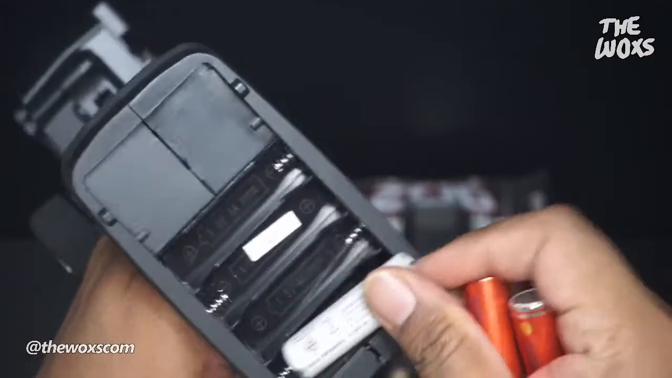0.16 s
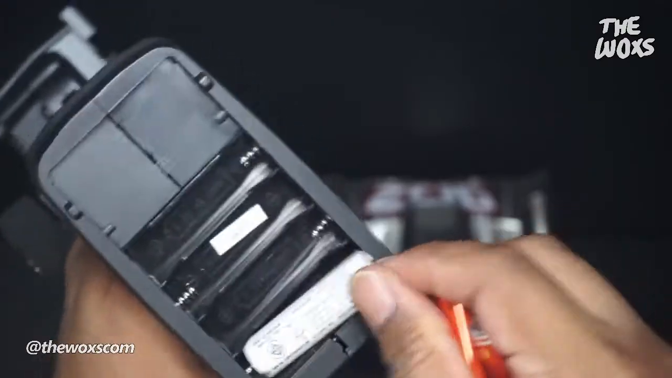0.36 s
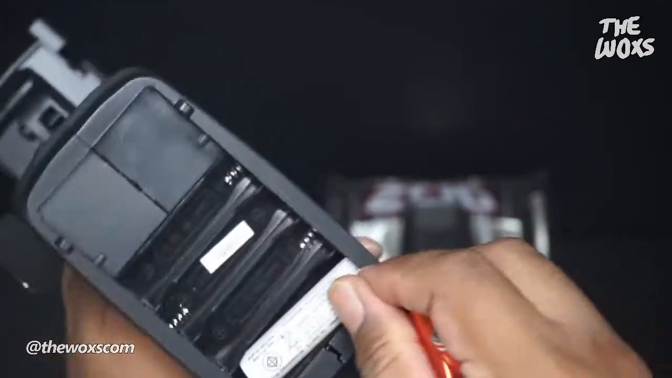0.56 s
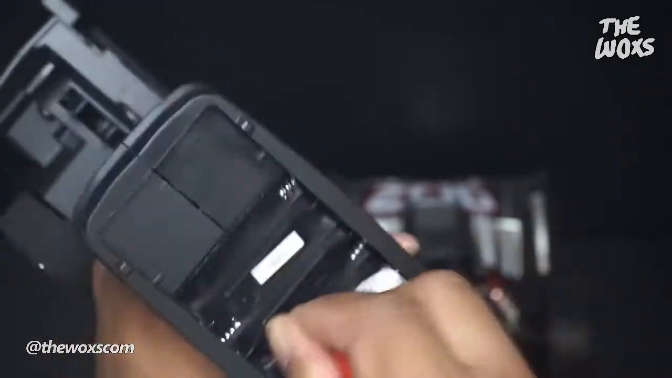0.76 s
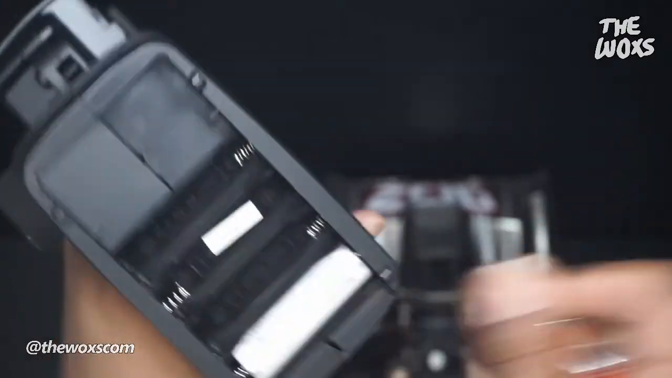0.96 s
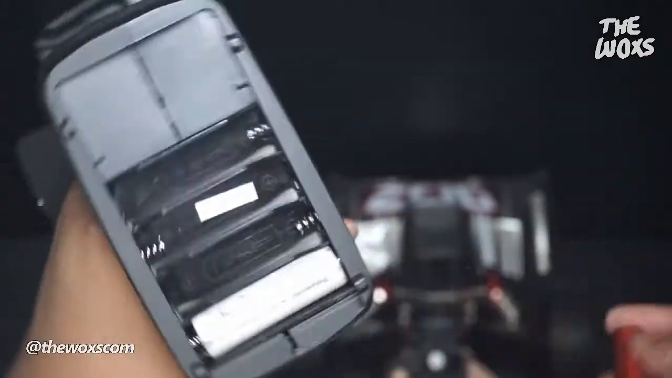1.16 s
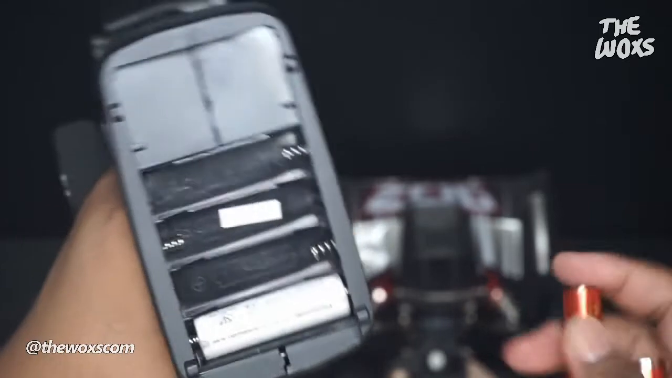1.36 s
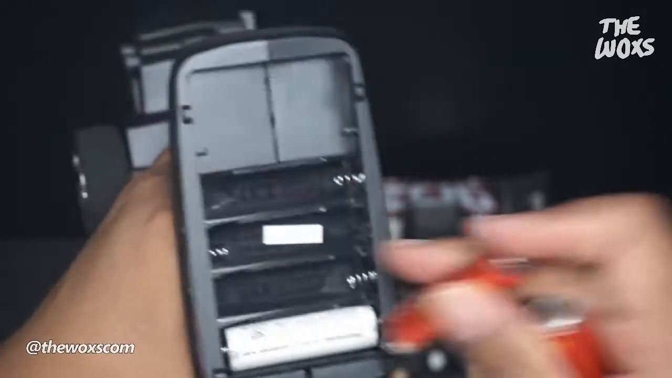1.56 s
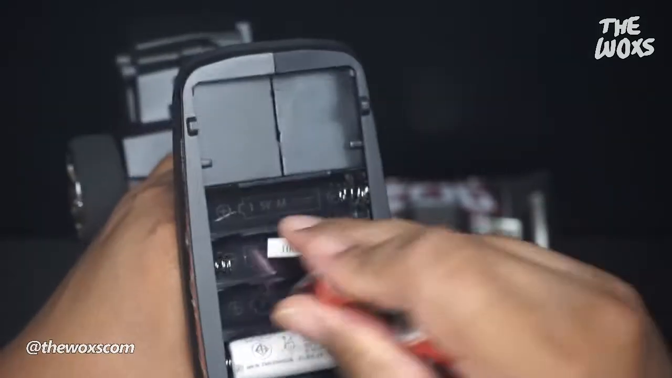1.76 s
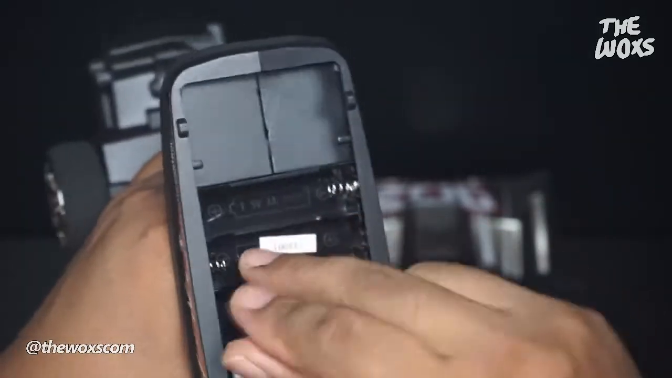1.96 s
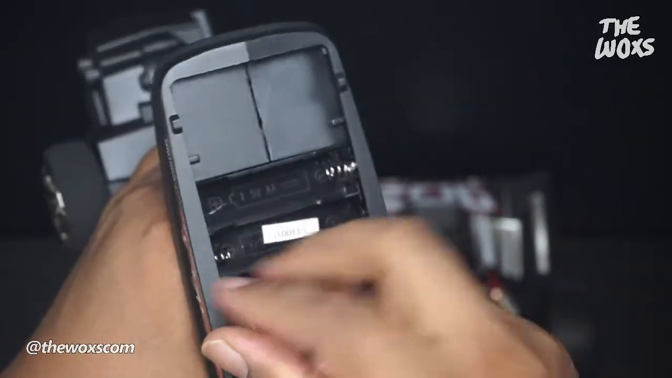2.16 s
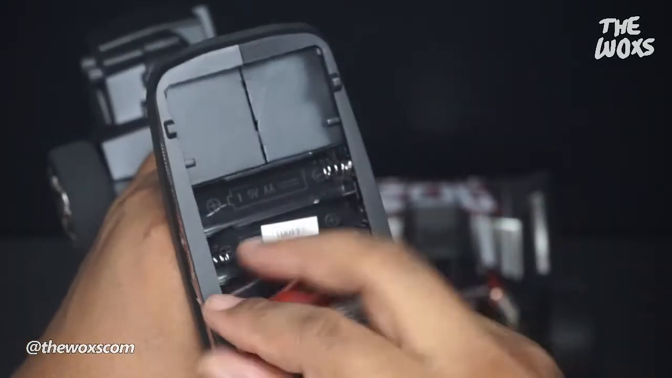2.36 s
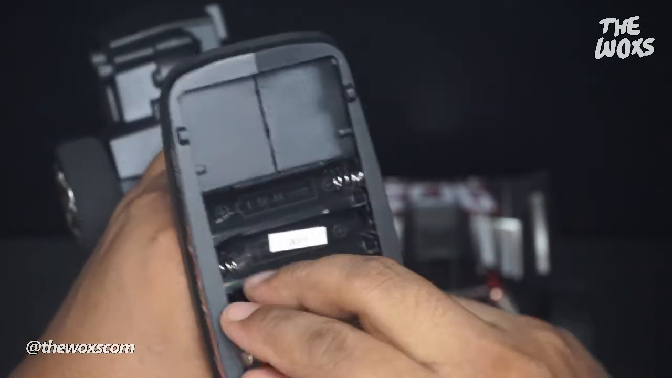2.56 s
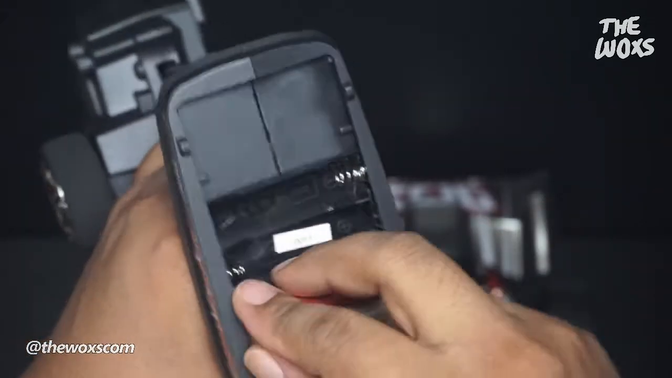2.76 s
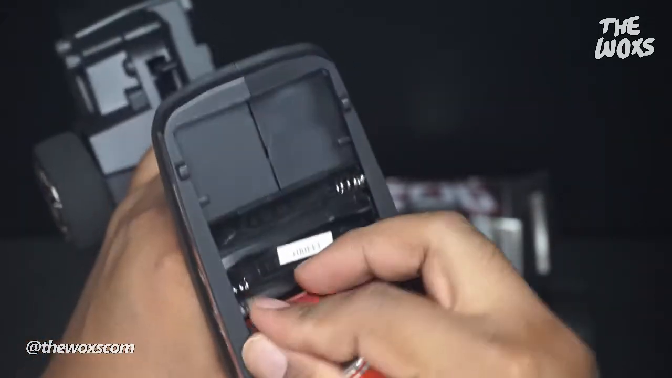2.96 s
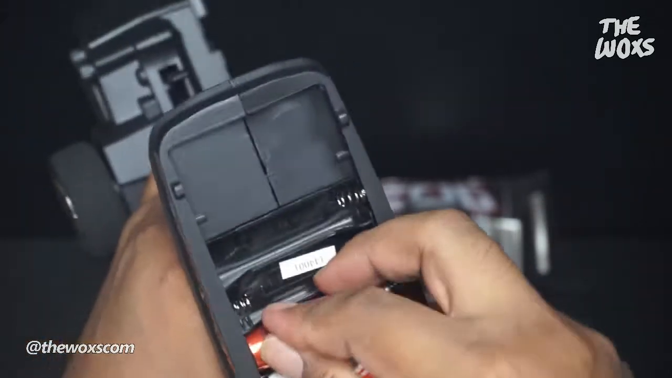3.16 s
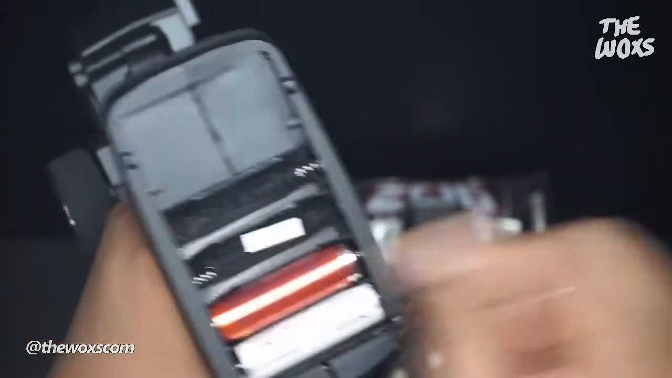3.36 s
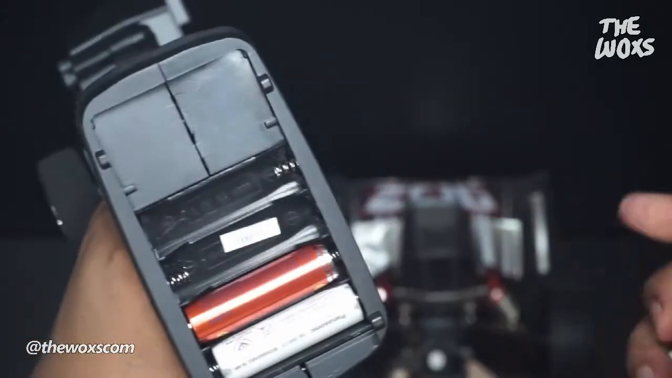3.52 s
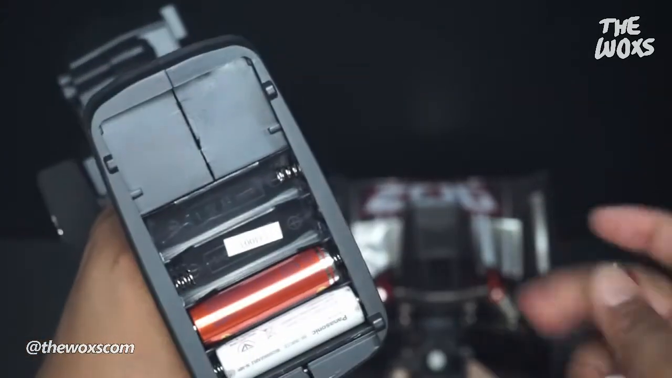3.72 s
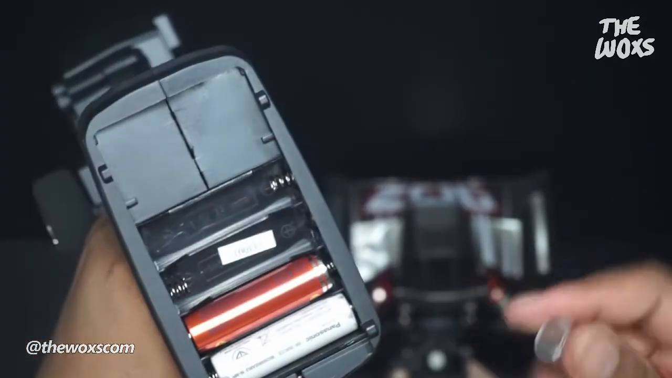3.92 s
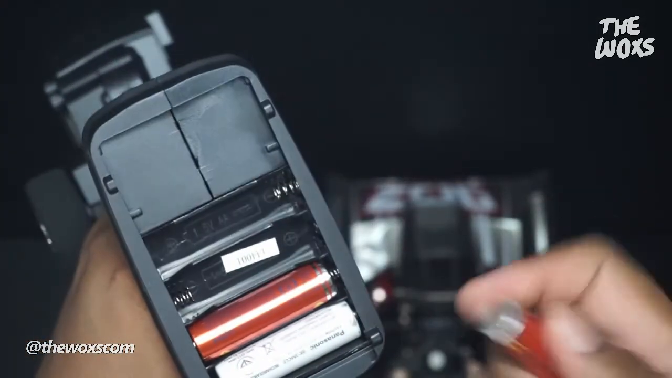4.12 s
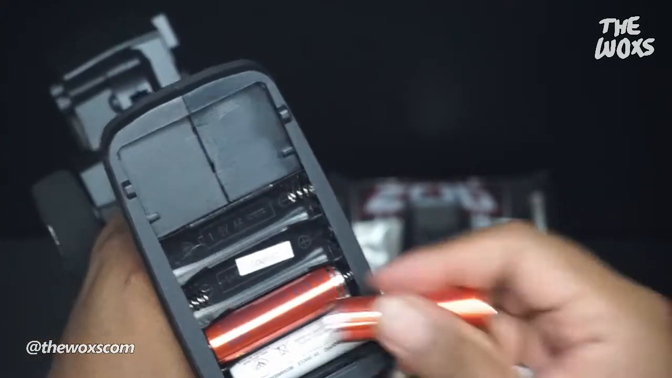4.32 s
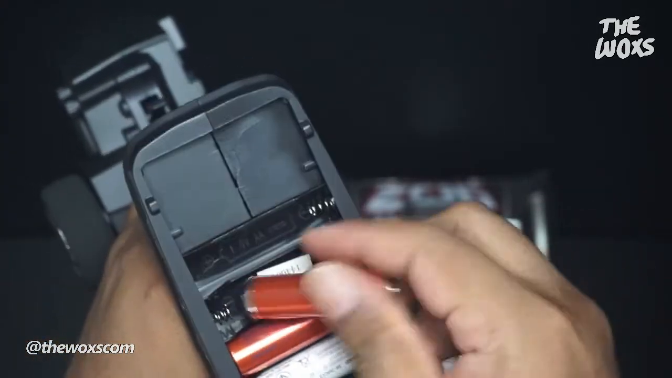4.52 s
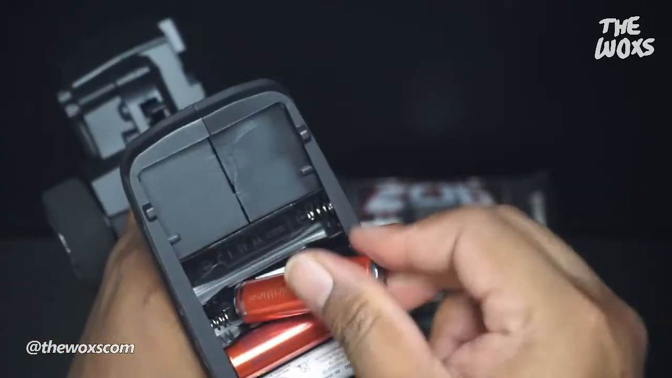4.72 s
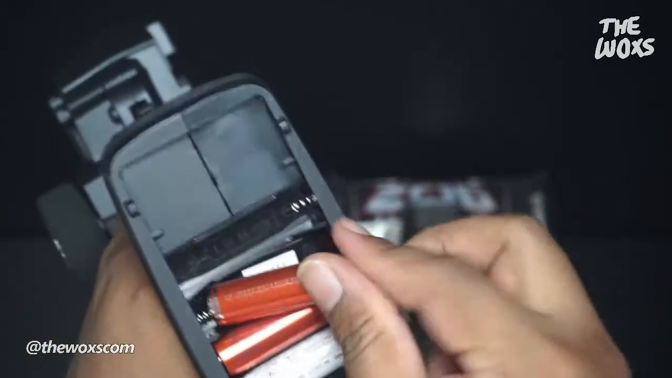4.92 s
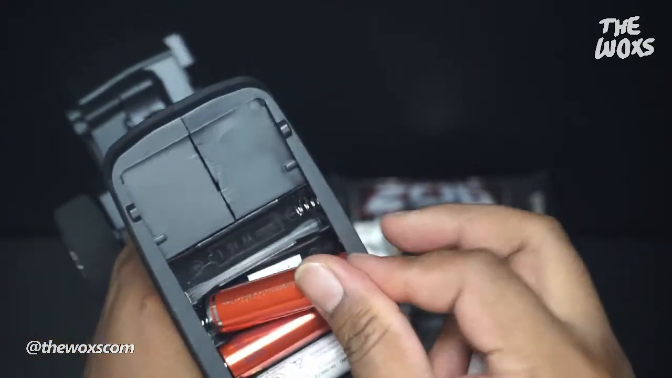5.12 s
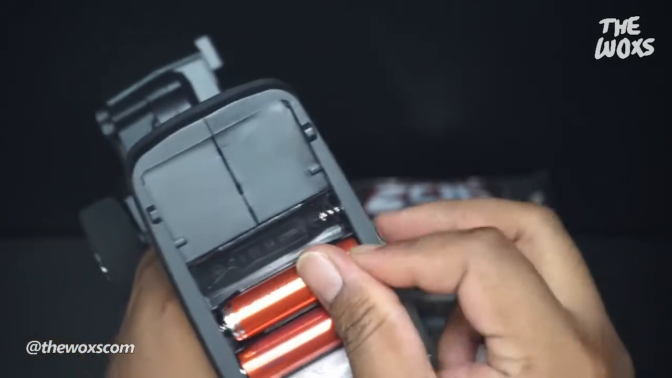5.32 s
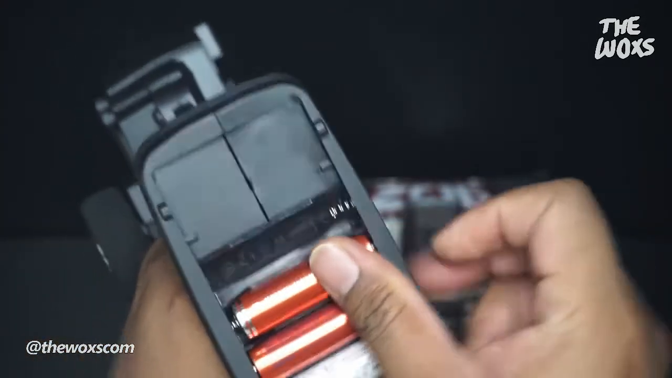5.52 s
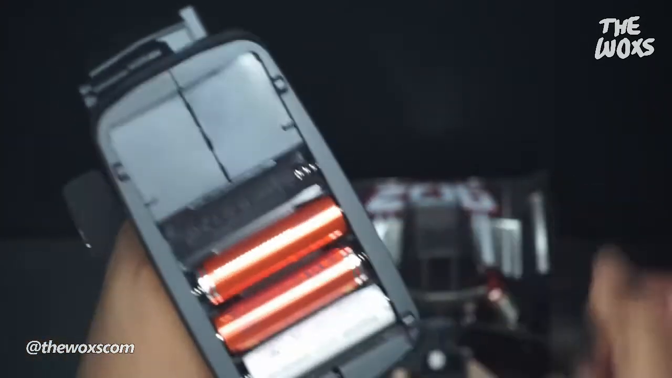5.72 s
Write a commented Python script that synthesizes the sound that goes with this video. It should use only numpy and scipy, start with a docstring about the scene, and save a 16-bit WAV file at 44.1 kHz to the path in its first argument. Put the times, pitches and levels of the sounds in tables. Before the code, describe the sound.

Batteries are pressed into a plastic remote, close to a stereo microphone in a small room, slightly left of centre, over faint rumble and hiss. After a soft finger rub, a hollow plastic knock comes at 0.4 seconds and a quick cluster at 0.7, with a coil spring ringing on. Loose batteries clink lightly around 1 to 1.2 seconds. From 1.8 to 2.1 seconds a battery clacks and grinds against a metal contact and knocks into its seat. Faint scrapes follow, then a knock at 2.8 and a loud snap just after 3 seconds with a slight spring ring. A quiet stretch holds only a rub and a small clink at 3.5. Light ticks and a clack come between 4.6 and 4.8, a knock at 5.2, and a loud ringing snap at 5.3. Soft slides and rubbing end by about 5.6 seconds.

```python
"""A small room, close to a stereo microphone: batteries are pressed one by one into a plastic remote.
Each cell scrapes along the case, snaps past its metal contact and knocks into its seat; every blow and
every tiny slip rings the damped modes of the case. A coil spring sings on after some snaps.
In between, loose cells clink and fingers rub and bump the case, over a faint rumble and hiss."""
import sys
import numpy as np
from scipy import signal
from scipy.fft import rfft, irfft, next_fast_len
from scipy.io import wavfile

SR = 44100
rng = np.random.default_rng(int(sys.argv[2]) if len(sys.argv) > 2 else 0)


def wrap_up_sound(samples):
    """Save the sound to the file named by the first command line argument, as 16-bit audio."""
    columns = np.atleast_2d(samples).T
    # keep every value between -1 and 1, then stretch to whole-number steps
    tamed = np.clip(columns, -1, 1)
    steps = np.round(tamed * 32767).astype(np.int16)
    wavfile.write(sys.argv[1], SR, steps)


N = 255339
TAIL = 16384  # samples of room decay
FAMILIES = ["thud", "shell", "contact", "snap", "tick"]  # the layers of a touch, low to high
EDGE_TILT = 0.28  # dB/octave of tick brightness per dB of edge


# a knock's mix: level/dB per family
KNOCK_MIX = [-12.5, 0, -7, -8, -5.5]
# seating knocks, and one short sharp snap at 5.3405 s: t/s, level/dB, edge/dB, metal/dB, rise/s, ring factor,
# shell focus/Hz
KNOCKS = [(0.4185, -23.5, 0, -3, 0.00025, 0.58, 1040), (0.6444, -30, 1.5, 0.5, 0.003, 1.4, 980),
          (0.661, -24.5, 6, 0, 0.00068, 0.75, 990), (0.6696, -24.5, 2, -2.5, 0.00032, 0.89, 1100),
          (2.107, -29, -2, -2.5, .0006, 0.97, 1060), (2.8079, -30, 2.5, -3.5, 0.00075, 0.92, 1040),
          (5.186, -27, 0.5, 6.5, 0.00034, 0.64, 1010), (5.327, -35, -2.5, 3.5, .0015, 2.5, 1160),
          (5.3405, -32, 14, 4.5, 0.00023, 0.22, 1310), (5.361, -32.5, -12, -5, .0005, 2.2, 1500)]
def knocks():
    """A cell drops into its seat: a hollow blow in the plastic shell, at times catching a contact too. One row
    is a short, sharp snap that dies almost at once."""
    for s, db, edge_db, metal_db, rise_s, ring, shell_hz in KNOCKS:
        mix_db = family_levels(KNOCK_MIX, db, edge_db, metal_db=metal_db)
        yield s, blow(mix_db, tilt_db=-1.7, rise_s=rise_s, ring=ring, pitch=0.9986, shell_hz=shell_hz)


# a clack's mix: level/dB per family
CLACK_MIX = [-20.5, -10, -.5, -10, -10]
# clacks on metal: t/s, level/dB, edge/dB, weight/dB, rise/s, shell focus/Hz
CLACKS = [(0.278, -46, 9, 5, 0.00051, 1180), (1.8448, -26.5, -3, 9, 0.0006, 1190),
          (1.893, -41, 4.5, 11, 0.00045, 1300), (1.91, -44.5, -8, 10, .0005, 1340),
          (1.931, -45.5, -3, 6, .0005, 1390), (1.975, -35.5, -4, -3, .0023, 1250),
          (2.0022, -28, -5, -19, 0.00045, 1440), (2.006, -30.5, -2, -7, 0.0013, 1450),
          (2.0461, -21, 4.5, -19, 0.016, 1430), (2.327, -51.5, 2, 11, 0.0017, 1110),
          (2.769, -53, 10.5, -9, .001, 1370), (2.901, -47.5, -3, 7, 0.00057, 1200),
          (3.0527, -20, 1.5, 3, 0.00031, 990), (4.663, -43.5, -4, 2, 0.0022, 1270),
          (4.7973, -34, -4, 5.5, 0.00066, 1330), (5.1753, -40, 1, -13, 0.00054, 1080),
          (5.337, -35, 10, -3, 0.00055, 1280), (5.344, -18.5, 1, -2.5, 0.0011, 1410)]
def clacks():
    """The end of a cell hits a contact plate: a hard blow, strongest in the mids."""
    for s, db, edge_db, weight_db, rise_s, shell_hz in CLACKS:
        mix_db = family_levels(CLACK_MIX, db, edge_db, weight_db)
        tilt_db = -3.5 + EDGE_TILT * edge_db
        yield s, blow(mix_db, tilt_db, rise_s, ring=1, pitch=1, shell_hz=shell_hz)


# a rim tick's mix: level/dB per family
TICK_MIX = [-17, -8, -7.5, -11.5, 1]
# rim ticks: t/s, level/dB, rise/s
RIM_TICKS = [(.283, -43.5, 0.00034), (.7315, -36.5, .0009), (.891, -41.5, .006), (3.008, -38, .0015),
             (3.024, -33, 0.00068), (4.5825, -43.5, 0.00044), (4.5986, -44.5, .0005),
             (4.6065, -41.5, 0.00044), (4.721, -52.5, .0005), (4.801, -40.5, 0.00092),
             (5.138, -52, 0.00046), (5.448, -46.5, 0.00055)]
def rim_ticks():
    """A cell's rim skips over a plastic edge: light, bright blows that hardly move the case."""
    for s, db, rise_s in RIM_TICKS:
        mix_db = family_levels(TICK_MIX, db)
        yield s, blow(mix_db, tilt_db=2.5, rise_s=rise_s, ring=1.23, pitch=0.95, shell_hz=1280)


# a clink's mix: level/dB per family
CLINK_MIX = [-26, -20, -14, -0.5, -7]
# cell on cell: t/s, level/dB, rise/s, ring factor, pitch factor
CLINKS = [(0.1439, -52.5, 0.0004, 1, 1.06), (0.9894, -45.5, .006, 0.89, 1), (.999, -45.5, .004, 1, 0.85),
          (1.112, -56, .003, 1, 0.79), (1.216, -44.5, .0006, 0.68, 1.14), (3.503, -50, 0.0011, 1, 0.8),
          (5.29, -44, .003, 1, 1.05)]
def clinks():
    """Loose cells tap together in the hand; each pair rings at its own pitch."""
    for s, db, rise_s, ring, pitch in CLINKS:
        mix_db = family_levels(CLINK_MIX, db)
        yield s, blow(mix_db, tilt_db=-5.5, rise_s=rise_s, ring=ring, pitch=pitch, shell_hz=1300)


# a slide's mix: level/dB per family
SLIDE_MIX = [-16, -3.5, -4, -2, 2]
# slides on plastic: start/s, end/s, level/dB, edge/dB
SLIDES = [(.405, .42, -39.5, -5), (.675, .704, -40.5, -16), (.691, .741, -49, 0), (2.072, 2.104, -56, -8),
          (2.789, 2.808, -51.5, 5.5), (5.14, 5.165, -61, -8), (5.175, 5.183, -47, 9.5),
          (5.383, 5.432, -47, -3), (5.605, 5.622, -54, 12), (5.615, 5.632, -49, 4.5)]
def slides():
    """A cell slides along the plastic trough with a broad rasp."""
    return strokes(SLIDES, SLIDE_MIX, tilt_db=-1.5, shell_hz=1330)


# a grind's mix: level/dB per family
GRIND_MIX = [-27.5, -11, -3.5, -13.5, -8.5]
# grinds on metal: start/s, end/s, level/dB, edge/dB
GRINDS = [(1.968, 1.978, -46, -11), (1.994, 2.002, -33, -4.5), (2.41, 2.438, -62, 6),
          (2.558, 2.575, -51.5, 4.5), (2.596, 2.622, -53.5, 1), (3.018, 3.051, -41, 2),
          (4.767, 4.794, -45, 0), (4.82, 4.891, -59.5, 9), (5.282, 5.299, -48, 5)]
def grinds():
    """The end of a cell drags over a contact with a gritty midrange."""
    return strokes(GRINDS, GRIND_MIX, tilt_db=-4.5, shell_hz=1380)


# a rub's mix: level/dB per family
RUB_MIX = [-24.5, -13.5, -10.5, -16, 1]
# finger rubs: start/s, end/s, level/dB, edge/dB
RUBS = [(.205, .295, -52.5, -3.5), (2.488, 2.556, -60, 2.5), (3.16, 3.3, -60.5, -4.5),
        (4.951, 5.032, -67.5, 9.5), (5.531, 5.606, -57.5, 1.5)]
def rubs():
    """A fingertip brushes the case, thin and airy."""
    return strokes(RUBS, RUB_MIX, tilt_db=2.0, shell_hz=1250)


# how far edge, weight and metal push the mix: share per family
EDGE_SHARE = [0, 0, 0, .6, 1]
WEIGHT_SHARE = [1, .3, 0, 0, 0]
METAL_SHARE = [0, 0, .8, 1, 0]
def family_levels(mix_db, db, edge_db=0, weight_db=0, metal_db=0):
    """A sharp edge feeds the highs, weight behind the cell the lows, touching metal the mids."""
    push_db = np.dot([edge_db, weight_db, metal_db], [EDGE_SHARE, WEIGHT_SHARE, METAL_SHARE])
    return db + np.array(mix_db) + push_db


# modes of the loaded case: f/Hz, level/dB, t60/s, family
CASE_MODES = [(423, -11, 0.034, "thud"), (495.5, 1, 0.027, "thud"), (600, -2, 0.022, "thud"),
              (931, -4, 0.033, "shell"), (1037, -1.5, 0.028, "shell"), (1289, -3.5, 0.025, "shell"),
              (1408, -3, 0.023, "shell"), (1540, -7, 0.035, "shell"), (1793, -6.5, 0.018, "contact"),
              (2000, -7.5, 0.021, "contact"), (2211, 1, 0.024, "contact"), (2482, -3, 0.014, "contact"),
              (2682, -3, 0.012, "snap"), (2950, -3.5, 0.016, "snap"), (3210, -5.5, 0.021, "snap"),
              (3612, -3.5, .014, "snap")]
# dense top modes of the metal contacts: f/Hz, level/dB
TICK_SPECTRUM = [(2200, -2), (3300, -1.5), (4000, 1.5), (5500, 2), (7000, -1), (9000, -1), (11000, 3),
                 (13500, 5), (15500, -0.5), (17000, -6)]
def case_ring(tilt_db, rise_s, ring, pitch, shell_hz, detune=0.024, uneven_db=2, tick_t60=0.023):
    """The struck case rings in five families of equal energy: family x channel x time."""
    t = np.arange(TAIL // 4) / SR
    layers = np.zeros((len(FAMILIES), 2, len(t)))
    for hz, db, t60, family in CASE_MODES:
        shift, strength = rng.standard_normal(2)  # grip and point of impact vary from blow to blow
        cycles = hz * pitch * (1 + detune * shift) * t
        build_up = 1 - np.exp(-2 * cycles)  # a mode needs half a cycle to build
        wave = np.sin(2 * np.pi * (cycles + rng.random())) * build_up
        if family == "shell":  # the point of impact favours the modes near shell_hz
            db -= 15 * abs(np.log2(hz / shell_hz))
        layers[FAMILIES.index(family)] += amp(db + uneven_db * strength - 60 * t / (t60 * ring)) * wave
    tilted = [(hz, db + tilt_db * np.log2(hz)) for hz, db in TICK_SPECTRUM]
    sizzle = coloured(noise_pair(len(t), likeness=[(1, 0.86)]), tilted)
    layers[-1] = sizzle * amp(-60 * t / (tick_t60 * ring))
    layers *= 1 - np.exp(-t / max(rise_s, 1 / SR))
    return layers / np.sqrt(energy(layers))


def blow(mix_db, tilt_db, rise_s, ring, pitch, shell_hz):
    """One strike rings all families; each level is an rms as if packed into 5 ms."""
    layers = case_ring(tilt_db, rise_s, ring, pitch, shell_hz)
    return np.tensordot(amp(mix_db), layers, 1) * np.sqrt(0.005 * SR)


def scrape(length_s, mix_db, tilt_db, shell_hz, slips_per_s=1200, grit_db=4.5, swell_db=7, points=4):
    """Under growing force, tiny uneven slips at several contact points keep the case ringing."""
    size = round(length_s * SR)
    force = signal.windows.tukey(size, 0.21) * amp(swell_db * np.linspace(0, 1, size))
    layers = 0
    for _ in range(points):
        chance, strength, direction = rng.random((3, size))
        grit = amp(grit_db * np.minimum(-np.log(strength), 4))
        slips = (chance < slips_per_s / SR) * grit * np.sign(direction - 0.5)
        body = case_ring(tilt_db, rise_s=0, ring=0.7, pitch=0.99, shell_hz=shell_hz)
        layers += signal.fftconvolve(body, (slips * force)[None, None], axes=2)
    layers /= np.sqrt(energy(layers) / size + 1e-20)
    return np.tensordot(amp(mix_db), layers, 1)


def strokes(rows, mix_db, tilt_db, shell_hz):
    """Scrapes of one kind; the sharper the edge, the brighter the grit."""
    for start, end, db, edge_db in rows:
        levels_db = family_levels(mix_db, db, edge_db)
        yield start, scrape(end - start, levels_db, tilt_db + EDGE_TILT * edge_db, shell_hz)


# modes of a coil spring and of a stiffer, compressed one: f/Hz, level/dB, t60/s, split/Hz
COIL_MODES = [(917, 0.5, 0.71, 1.76), (1830, -21, 0.96, 1.4), (1690, -3, 0.3, 8.5), (2616, -27, .35, 3)]
STIFF_MODES = [(1330, -8.5, 0.38, 3.6), (1510, -3, .29, 4.8), (2190, -3, 0.35, 15), (2328, -10, 0.32, 3.6),
               (2457, -5, 0.28, 2.3)]
# their plucks: t/s, level/dB
COIL_PLUCKS = [(0.42, -39), (.668, -31), (3.053, -44)]
STIFF_PLUCKS = [(3.053, -40), (4.797, -49), (5.344, -27), (5.615, -47)]
def spring(modes, plucks):
    """A coil swings in two planes of nearly equal pitch, so its ring swells before it dies."""
    t = np.arange(SR) / SR
    ring, track = np.zeros(SR), np.zeros((2, N))
    for hz, db, t60, split_hz in modes:
        beating = np.sin(np.pi * split_hz * t)
        ring += amp(db - 60 * t / t60) * beating * np.sin(2 * np.pi * hz * t)
    for s, db in plucks:
        add(track, s, amp(db) * np.array([ring, ring]))
    return microphones(track, DIFFUSE_BALANCE)


# soft hand bumps: t/s, level/dB, f/Hz, t60/s
BUMPS = [(1.8458, -37, 263, 0.034), (2.1077, -48.5, 210, 0.058), (5.1861, -48, 230, .04),
         (5.344, -55, 226, 0.036)]
def bumps():
    """The whole remote gives a short low note against the hand."""
    t = np.arange(TAIL // 2) / SR
    for s, db, hz, t60 in BUMPS:
        note = amp(db - 60 * t / t60) * np.sin(2 * np.pi * hz * t)
        yield s, np.array([note, note])


# echo colour, against the direct sound: f/Hz, level/dB
ROOM_COLOUR = [(150, -8), (480, -4.5), (750, 1), (1000, -10), (1350, 3.5), (1700, 0), (2200, -5.5),
               (3200, -2), (5500, -1), (8000, -3), (14000, -6.5)]
# echo decay: f/Hz, t60/s
ROOM_T60 = [(200, 0.26), (600, 0.24), (1500, 0.22), (4500, 0.27), (13000, 0.28)]
# echo width: f/Hz, left-right likeness
ROOM_LIKENESS = [(200, 0.69), (1000, 0.76), (2200, 0.38), (5000, 0.099), (14000, .2)]
# panning of the direct sound, and of echoes and springs: f/Hz, left minus right/dB
DIRECT_BALANCE = [(100, -5), (500, 3.5), (1000, 3), (2200, 4), (5000, 5.5), (8000, 7), (13000, 9.5)]
DIFFUSE_BALANCE = [(100, -9), (1000, 4), (2200, 2.5), (6000, 5), (14000, 6.5)]
def in_room(events, first_echo_s=0.0021):
    """Each touch sounds directly and with its own diffuse echoes, as the remote moves in the hand."""
    track = np.zeros((2, N))
    onset = np.clip(np.arange(TAIL) / SR / first_echo_s - 0.5, 0, 1)
    for s, sound in events:
        hz, t, bands = signal.stft(noise_pair(TAIL, ROOM_LIKENESS), SR, nperseg=256)
        t60 = curve(ROOM_T60, hz)[:, None]
        decay = amp(curve(ROOM_COLOUR, hz)[:, None] - 60 * t / t60)
        unit_energy = np.sqrt(2 * np.log(1000) / (t60 * SR))
        tail = signal.istft(bands * decay * unit_energy, SR, nperseg=256)[1][:, :TAIL]
        echoes = signal.fftconvolve(sound[:1], tail * onset, axes=1)
        direct = np.pad(sound, ((0, 0), (0, TAIL - 1)))
        add(track, s, microphones(direct, DIRECT_BALANCE) + microphones(echoes, DIFFUSE_BALANCE))
    return track


# phase between the capsules: f/Hz, left lead/rad
LEFT_LEAD = [(100, -5), (500, 0.87), (1000, -1.2), (2200, -0.53), (5000, -0.7), (14000, -1)]
def microphones(x, balance):
    """The two capsules hear the remote with different level and phase."""
    size = next_fast_len(x.shape[1] + TAIL)
    hz = np.fft.rfftfreq(size, 1 / SR)
    right = amp(-curve(balance, hz)) * np.exp(-1j * curve(LEFT_LEAD, hz))
    equal_power = np.sqrt(2 / (1 + abs(right) ** 2))
    pair = np.array([np.ones(len(hz)), right]) * equal_power
    return irfft(rfft(x, size) * pair, size)[:, :x.shape[1]]


# noise bed, centre and sides: f/Hz, level/dB
HISS_MID = [(10, -14), (20, -3.5), (50, -0.5), (110, -0.5), (250, -2), (500, -7.5), (1000, -10.5),
            (2500, -14.5), (6000, -17.5), (15500, -19.5), (17000, -27)]
HISS_SIDE = [(10, -32), (20, -22), (50, -8), (110, -4.5), (250, 0.5), (500, 0.5), (1000, -1.5),
             (2500, -8.5), (6000, -13.5), (15500, -16.5), (17000, -27)]
def hiss(mid_db=-61.5, side_db=-60.5):
    """Steady room rumble and microphone hiss."""
    mid = amp(mid_db) * unit_rms(coloured(rng.standard_normal(N), HISS_MID))
    side = amp(side_db) * unit_rms(coloured(rng.standard_normal(N), HISS_SIDE))
    return np.array([mid + side, mid - side])


def amp(db):
    return 10 ** (np.asarray(db) / 20)


def unit_rms(x):
    return x / np.sqrt(np.mean(x ** 2) + 1e-20)


def energy(layers):
    """Energy of each family, averaged over the channels."""
    return (layers ** 2).mean(1).sum(1)[:, None, None]


def curve(points, hz):
    """Reads a table on a log-frequency axis."""
    f, value = np.transpose(points)
    return np.interp(np.log(hz + 1), np.log(f + 1), value)


def add(track, s, sound):
    """Adds a stereo sound at time s."""
    part = track[:, round(s * SR):][:, :sound.shape[1]]
    part += sound[:, :part.shape[1]]


def coloured(x, points):
    """Shapes x by a dB spectrum."""
    hz = np.fft.rfftfreq(x.shape[-1], 1 / SR)
    return irfft(rfft(x) * amp(curve(points, hz)), x.shape[-1])


def noise_pair(size, likeness):
    """White noise on two channels, alike by the given amount at each frequency."""
    left, other = rfft(rng.standard_normal((2, size)))
    same = curve(likeness, np.fft.rfftfreq(size, 1 / SR))
    right = same * left + np.sqrt(1 - same ** 2) * other
    return irfft(np.array([left, right]), size)


# the small case radiates little bass: f/Hz, level/dB
RADIATION = [(40, -34), (150, -15), (300, -3.5), (450, 0)]
def scene():
    """Blows, scrapes and bumps in the room, with the springs and the noise bed."""
    touches = [*knocks(), *clacks(), *rim_ticks(), *clinks(), *slides(), *grinds(), *rubs()]
    case = coloured(in_room(touches), RADIATION)
    springs = spring(COIL_MODES, COIL_PLUCKS) + spring(STIFF_MODES, STIFF_PLUCKS)
    return case + springs + in_room(bumps()) + hiss()


def record(dry):
    """A steep low-pass trims the very top."""
    lowpass = signal.firwin(255, 16050, window=("kaiser", 8), fs=SR)
    return signal.oaconvolve(dry, lowpass[None], "same")


dry = scene()
out = record(dry)
wrap_up_sound(out)
```